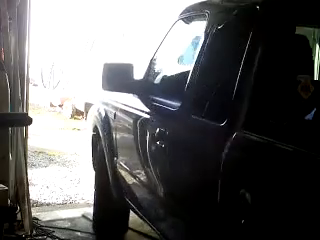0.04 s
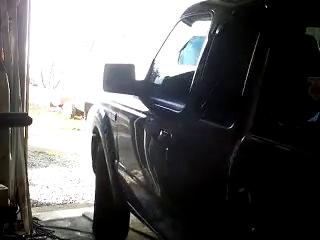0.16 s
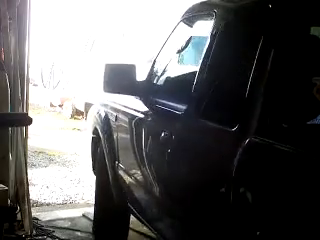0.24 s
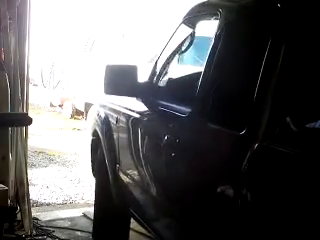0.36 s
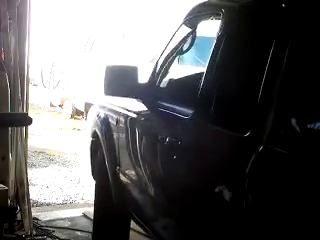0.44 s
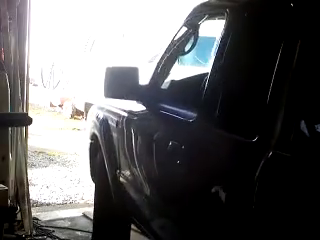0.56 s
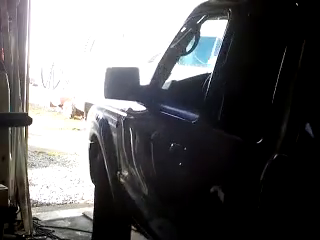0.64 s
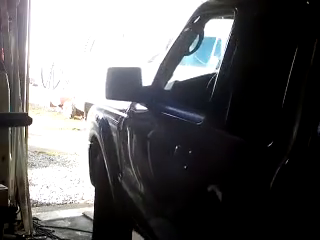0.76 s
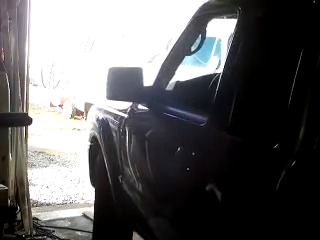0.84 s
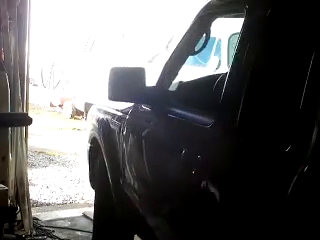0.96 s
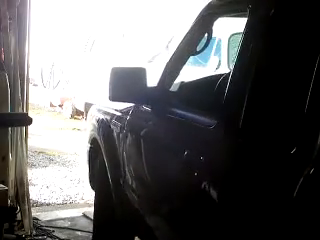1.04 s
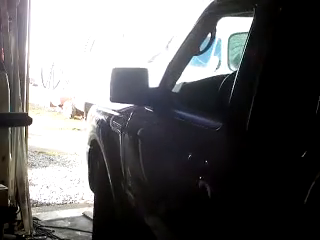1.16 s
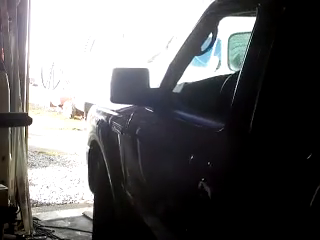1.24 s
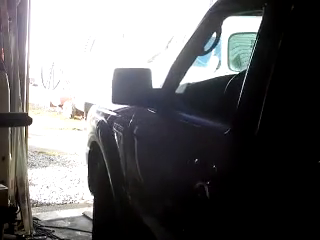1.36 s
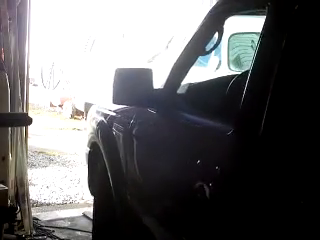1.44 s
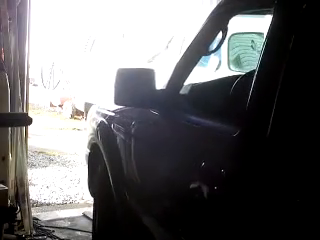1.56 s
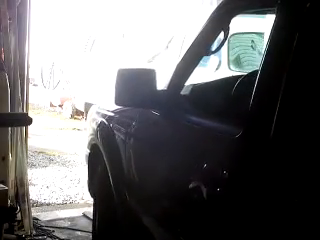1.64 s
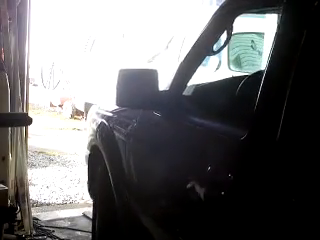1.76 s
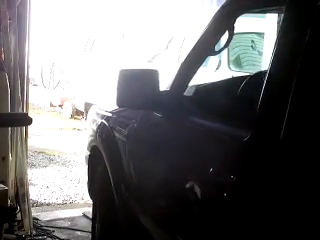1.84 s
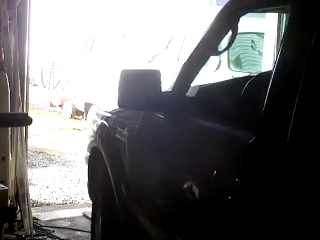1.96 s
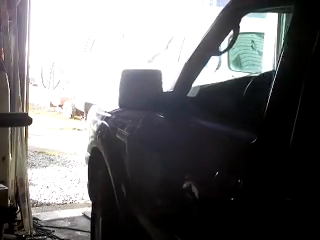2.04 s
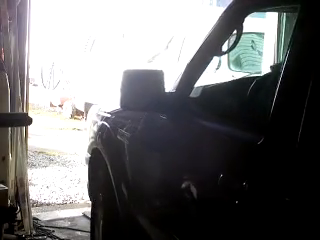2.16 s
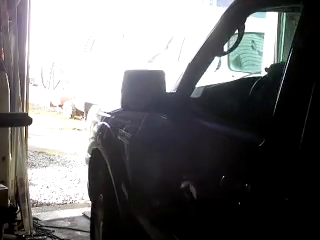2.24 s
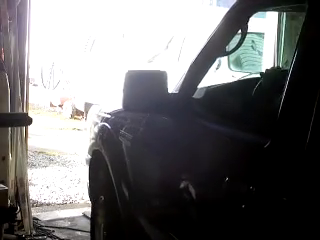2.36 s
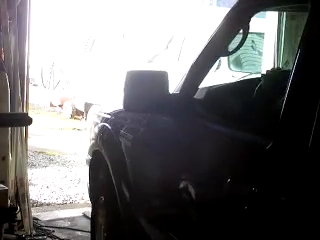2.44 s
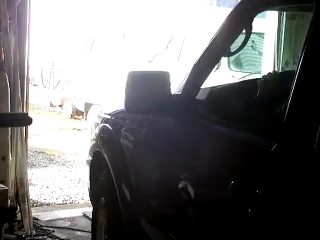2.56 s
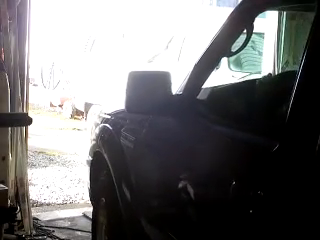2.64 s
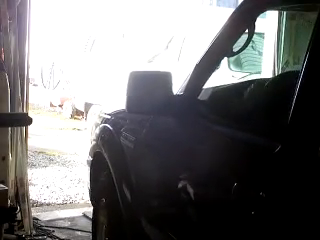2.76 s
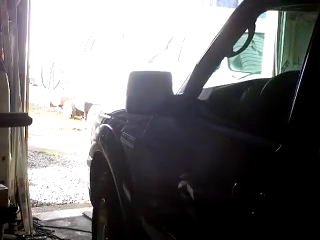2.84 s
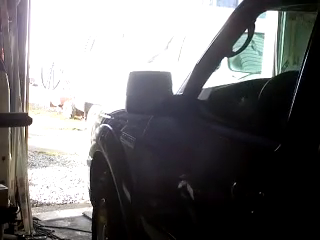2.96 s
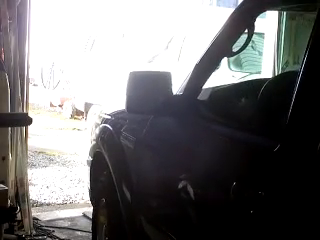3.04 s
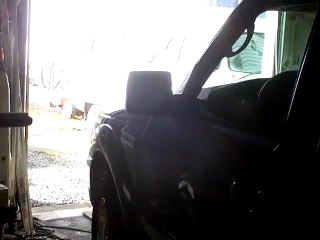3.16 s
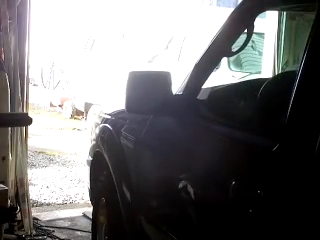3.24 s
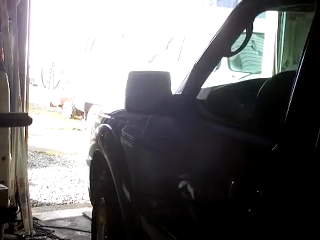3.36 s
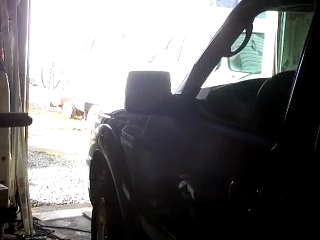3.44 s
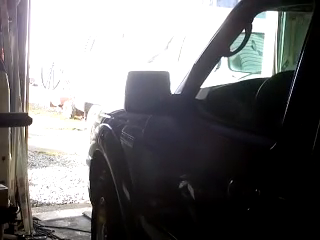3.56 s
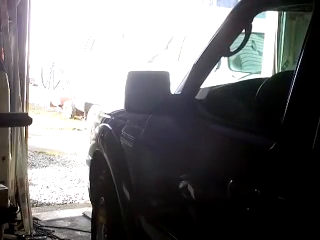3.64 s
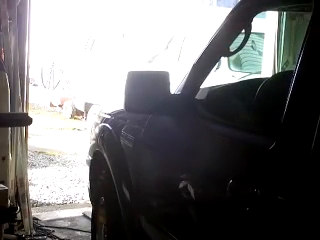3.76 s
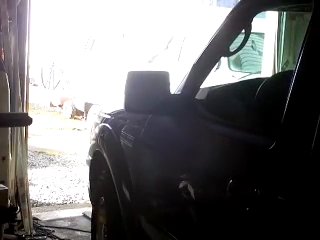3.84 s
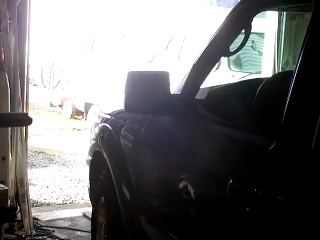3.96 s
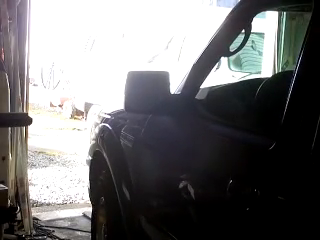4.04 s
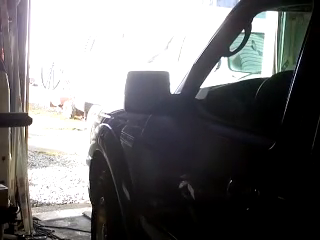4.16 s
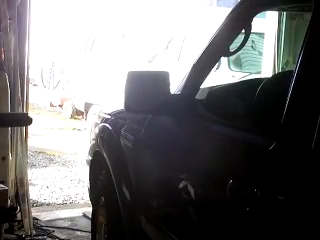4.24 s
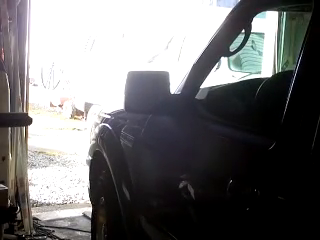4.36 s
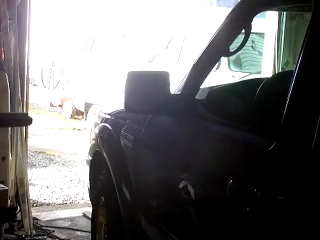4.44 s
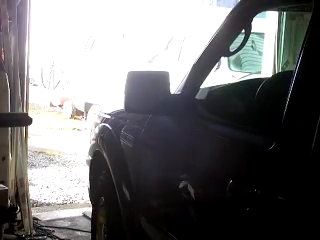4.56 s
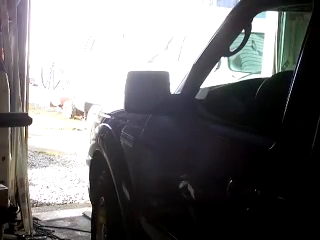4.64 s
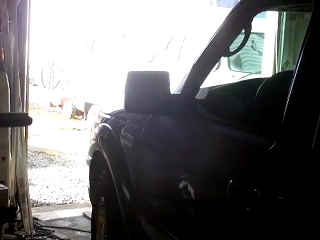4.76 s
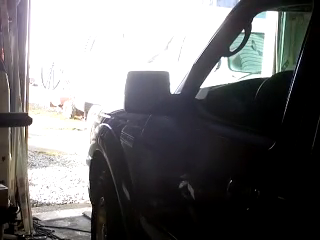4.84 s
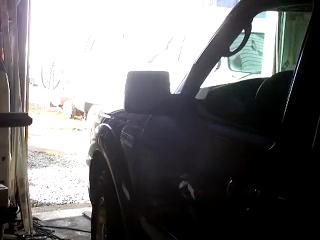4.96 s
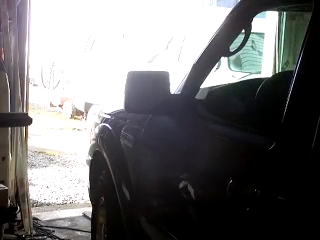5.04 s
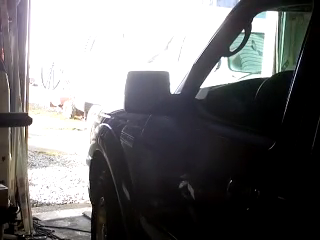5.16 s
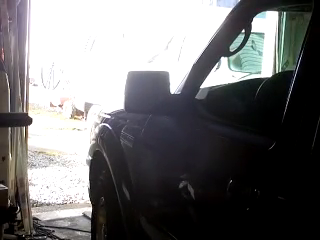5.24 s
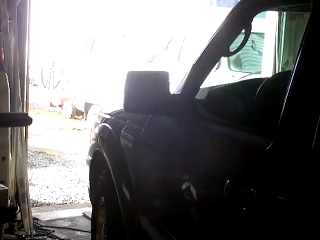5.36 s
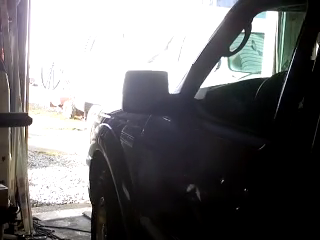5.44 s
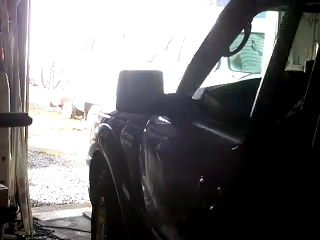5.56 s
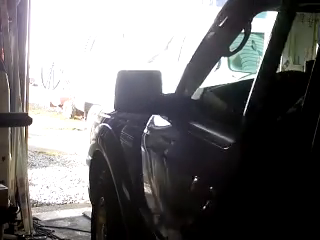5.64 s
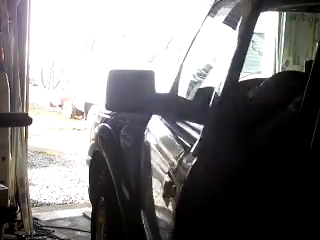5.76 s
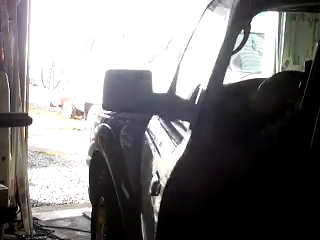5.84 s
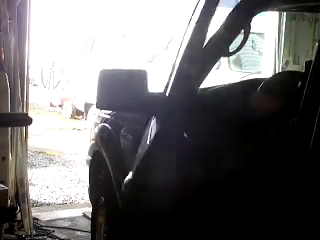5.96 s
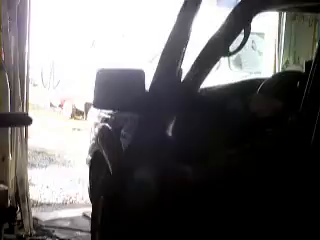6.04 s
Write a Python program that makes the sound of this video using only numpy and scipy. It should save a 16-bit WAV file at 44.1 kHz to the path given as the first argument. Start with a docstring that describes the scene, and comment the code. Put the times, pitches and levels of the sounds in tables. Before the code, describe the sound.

A pickup's six-cylinder engine idles from the start, heard close beside the cab in a garage doorway. The exhaust drones and booms unevenly, with valve clatter, fan and belt hiss and thin pulley whine. A panel buzz peaks around 0.2 s and fades; at 0.25 s a small hard object clacks down and bounces. Gritty shoe scuffs come at 0.6 and 0.8 s, with shorter ones around 2.4, 2.7 and 3.1 s. From about 1.2 s the idle eases slightly slower, still lumpy. At 4.04 s the engine is switched off, dropping quickly in pitch and shuddering to rest by about 5 s. Light hollow taps sound over quiet low yard noise. Soft handle knocks from 5.1 s lead to a hard, bright latch knock with a low thump at 5.41 s. Rattles follow, then the door is caught at 5.7 s with a hollow metallic clunk and small final knocks to 6 s.

```python
"""A six-cylinder pickup idles fast in a garage doorway, heard from beside the cab, then settles to a slower idle.
Firings drone and boom in the exhaust, valve gear clatters, fan and belt hiss, pulleys whine and a panel buzzes.
Early on, something small and hard clacks down; now and then shoes scuff the concrete with gritty noise.
At 4.04 s the engine is switched off: it slows and shudders to rest while light taps ring the cab.
Then handle and latch knock, ringing sheet metal, and the door springs open, thuds and is caught by its stay."""
import sys
import numpy as np
from scipy import signal
from scipy.fft import rfft, irfft, next_fast_len
from scipy.io import wavfile
from scipy.ndimage import uniform_filter1d

SR = 44100
rng = np.random.default_rng(int(sys.argv[2]) if len(sys.argv) > 2 else 0)


def pcm_store(signal):
    """Save signal as 16-bit PCM."""
    levels = np.round(np.clip(np.atleast_2d(signal), -1, 1) * 32767)
    wavfile.write(sys.argv[1], SR, levels.astype(np.int16).T)


N = 268569
T = np.arange(N) / SR  # time [s]


def undb(db):
    """Turn decibels into a gain."""
    return 10 ** (np.asarray(db) / 20)


def unit(x):
    """Scale to an average (rms) strength of 1."""
    return x / np.sqrt(np.mean(x ** 2) + 1e-20)


def curve(rows, axis=1):
    """One column of a table, joined by straight lines in time."""
    rows = np.array(rows)
    return np.interp(T, rows[:, 0], rows[:, axis])


def at(points, hz):
    """Read (Hz, value) points along a log-frequency axis."""
    f, value = np.transpose(points)
    return np.interp(np.log(hz + 1e-3), np.log(f), value)


def colour(x, points, tilt_db=0):
    """Filter with the given spectrum, tilted about 1 kHz by tilt_db per octave."""
    size = 2 * next_fast_len(len(x))
    hz = np.arange(size // 2 + 1) * SR / size
    octaves = np.log2(np.maximum(hz, 100) / 1000)
    # folding the cepstrum makes the filter respond only after its input
    cepstrum = irfft(np.log(undb(at(points, hz) + tilt_db * octaves)))
    cepstrum[1:size // 2] *= 2
    cepstrum[size // 2 + 1:] = 0
    response = np.exp(rfft(cepstrum))
    return irfft(rfft(x, size) * response)[:len(x)]


def swell(s, half):
    """A smooth bump of height 1 around time s."""
    return np.exp(-((T - s) / half) ** 2)


def decay(age, t60):
    """Die away by 60 dB in t60 seconds."""
    return np.exp(-np.log(1000) * age / t60)


def noise():
    """White noise: equal strength at all pitches."""
    return rng.standard_normal(N)


def walk(rate):
    """Smooth random wandering with a spread near 1, from about `rate` random steps per second."""
    k = int(SR / rate)
    steps = np.repeat(rng.standard_normal(N // k + 1), k)[:N]
    return unit(uniform_filter1d(uniform_filter1d(steps, k), k))


def tone(hz, waver):
    """A steady tone of rms 1 whose phase wavers."""
    return np.sqrt(2) * np.sin(2 * np.pi * hz * T + waver * (walk(20.97) + .5 * walk(90)))


def resonate(x, hz, width_hz):
    """One resonance, gain 1 at its centre."""
    return signal.lfilter(*signal.iirpeak(hz, hz / width_hz, fs=SR), x)


def band_noise(hz, width_hz):
    """Noise through the same resonance twice, rms 1."""
    return unit(resonate(resonate(noise(), hz, width_hz), hz, width_hz))


def strike(blows, modes, grit, grit_db, grit_t60):
    """Hard contacts: each rings the modes, slightly detuned, and leaves a short burst of grit."""
    out = 0
    for s, db in blows:
        age = np.maximum(T - s, 0)
        out = out + undb(db + grit_db) * grit * (T > s) * decay(age, grit_t60)
        detune = 1 + 0.008 * rng.standard_normal(len(modes))
        for (hz, mode_db, t60), shift in zip(modes, detune):
            out = out + undb(db + mode_db) * np.sin(2 * np.pi * hz * shift * age) * decay(age, t60)
    return out


KEY_OFF_S, COAST_HZ_PER_S = 4.04, 28  # ignition off; friction then slows the firings evenly
# idle speed, settling from a fast idle: (time [s], firing rate [firings per second])
IDLE_SPEED = [(0, 27.15), (.75, 27.65), (1.15, 27.5), (1.4, 26.8), (1.75, 26.75), (2, 25.8), (2.5, 25.55),
              (2.78, 26.4), (3, 25.65), (4.02, 25.75)]


def firing_rate():
    """Firings per second: the idle, then an even coast to rest."""
    return np.maximum(curve(IDLE_SPEED) - COAST_HZ_PER_S * np.maximum(T - KEY_OFF_S, 0), 0)


STALL_S = 0.37  # time for the driven parts to fade after the ignition goes off


def running_fade():
    """1 while the engine runs, then a straight fall to 0 after the ignition goes off."""
    return np.clip(1 - (T - KEY_OFF_S) / STALL_S, 0, 1)


SETTLE_FROM_S, SETTLE_S = 1.2, 2.1  # fast idle gives way to settled idle: start and duration


def settling():
    """0 at fast idle, 1 at settled idle."""
    return np.clip((T - SETTLE_FROM_S) / SETTLE_S, 0, 1)


# loudness of the exhaust before lope, stall and pipe ring: (time [s], level [dB])
EXHAUST_LEVEL = [(0, -33), (.4, -31.5), (.55, -31), (1.05, -34), (1.6, -33.5), (2, -33.5), (2.2, -31),
                 (3.1, -32.5), (4.2, -31.5)]
# strong beats and stumbles from uneven combustion: (time [s], gain [dB], half length [s])
UNEVEN_BEATS = [(.435, -4, .018), (.575, 4.5, .045), (.652, -8, .018), (.695, 2.5, .02), (.765, -4, .018),
                (.91, 1.5, .025), (1.02, 2, .025), (1.11, 2, .02), (1.172, -7, .022), (1.24, 2, .025),
                (1.35, 3, .025), (1.525, -4, .02), (1.845, -4, .018), (2.295, -8, .018), (2.335, 3, .02),
                (2.41, 3, .025), (2.61, -7, .018), (2.81, 2.5, .04), (2.89, -4, .018), (3.11, -6, .03),
                (3.25, 2.5, .03), (3.35, 2.5, .025), (3.4, -4, .015), (3.83, -4, .018), (4.19, 3.5, .03)]
# colour of the boom in the pipe: (frequency [Hz], relative level [dB per Hz])
PIPE_SPECTRUM = [(20, -11.5), (38, -16), (55, -4.5), (70, -11), (88, -4.5), (104, -9), (122, -5), (170, -8),
                 (195, -9), (220, -26.5), (400, -65)]
# drone: (multiple of the crank rate, fast-idle level [dB], settled-idle level [dB]), levels relative
DRONE_ORDERS = [(3, -14, -6), (6, -12, -10), (7, -22, -21), (8, -25, -8), (9, -2.5, -6), (10, -15, -19),
                (11, -8, -22), (12, -1, -5), (13, -21, -17), (15, -18, -18), (16, -21, -17), (18, -11, -19),
                (19, -19, -17), (20, -17, -18), (21, -9, -9), (23, -30, -20), (30, -14, -19),
                (33, -19, -24), (36, -30, -15), (39, -22, -25), (42, -32, -24), (49, -20, -34),
                (51, -32, -23), (52, -32, -22)]
# unequal cylinders make the exhaust lope:
# (firings per swell, peak as a share of the swell, fast-idle depth [dB], settled-idle depth [dB])
LOPE_SWELLS = [(6, .68, 1.0, .3), (3, .42, .7, .4)]
PIPE_RING_HZ, PIPE_RING_WIDTH_HZ, PIPE_RING_DB = 86.8, 2.2, 8  # a sharp resonance of the pipe
BEAT_WIDTH_HZ = 65
PUMPING_DB = -4.5  # change in level without fuel, when the engine only pumps air
PUMPING_SPEED_POWER = 1.2  # pumped air fades with speed to this power


def exhaust(firing, speed, running, drone_db=-1.0, boom_db=-13, waver_db=1.5, dispersion=.04):
    """The crank's orders drone and lope; chance in the firings makes the pipe boom between them."""
    settled = settling()
    drone = 0
    for k, fast_db, slow_db in DRONE_ORDERS:
        db = fast_db + settled * (slow_db - fast_db) + waver_db * walk(7)
        # every third order is locked to the firings; the rest drift with the balance of the cylinders
        drift = 1.5 * walk(1.5) if k % 3 else .2 * walk(9)
        # the long pipe delays the higher orders, smearing each firing
        phase = 2 * np.pi * k * firing / 3 - dispersion * k ** 2 + drift
        drone = drone - undb(db) * np.cos(phase)

    starts = np.flatnonzero(np.diff(np.floor(firing)))
    pulses = np.zeros(N)
    pulses[starts] = np.tanh(rng.standard_normal(len(starts)))  # each firing has a random strength
    boom = unit(colour(unit(pulses) + noise(), PIPE_SPECTRUM))

    lope_db = 0
    for every, peak, fast_db, slow_db in LOPE_SWELLS:
        depth_db = fast_db + settled * (slow_db - fast_db)
        lope_db = lope_db + depth_db * np.cos(2 * np.pi * (firing / round(every) - peak))
    stall = undb(PUMPING_DB * (1 - running)) * speed ** PUMPING_SPEED_POWER
    gas = undb(drone_db) * unit(drone) + undb(boom_db) * boom
    gas = gas * undb(curve(EXHAUST_LEVEL) + lope_db) * stall
    gas = gas + undb(PIPE_RING_DB) * resonate(gas, PIPE_RING_HZ, PIPE_RING_WIDTH_HZ)
    # strong and weak beats show in the pipe's lowest resonance
    beats_db = sum(db * swell(s, half) for s, db, half in UNEVEN_BEATS)
    return gas + (undb(beats_db) - 1) * resonate(gas, PIPE_RING_HZ, BEAT_WIDTH_HZ)


# colour of the clatter through the engine block: (frequency [Hz], relative level [dB per Hz])
BLOCK_SPECTRUM = [(120, -42), (215, 5.5), (255, -0.5), (340, 2), (480, -3), (660, -5.5), (830, -3),
                  (1030, 2.5), (1220, -3), (1400, -11), (2000, -14), (2900, -13.5), (4400, -26),
                  (10000, -56)]
# ringing of block and covers: (frequency [Hz], width [Hz], relative level [dB])
COVER_MODES = [(266, 12, -7), (370, 31, 2), (447, 21, 0), (520, 7, -1), (608, 14, -1.5), (722.4, 8.5, 4),
               (813, 15, 0), (905, 14, -1.5), (1008, 25, -7.5), (1179, 14, 0)]
# colour of the fan and belt hiss: (frequency [Hz], relative level [dB per Hz])
FAN_SPECTRUM = [(880, -25), (1500, 3.5), (1780, 1), (3020, 1.5), (4310, -6.5), (6060, -9.5), (7310, -13),
                (7990, -19), (9250, -16.5), (10400, -33.5), (13600, -63), (22000, -120)]
# fan and belt hiss at idle: (time [s], level [dB])
HISS_LEVEL = [(0, -54), (.6, -51.5), (1.3, -53), (1.9, -51.5), (2.4, -51.5), (3, -54.5), (4, -55)]
CLATTER_DB, CLATTER_SPEED_POWER = -44, 1.7  # level at idle; amplitude goes with speed to this power
FAN_SPEED_POWER = 2


def engine_bay(firing, speed, tap_decay=1.0, flicker_db=1):
    """Valve gear and pistons repeat their clatter each crank turn and ring the covers; the fan hisses more evenly."""
    loose, beat, covers_db, cover_waver_db = .6, 1.0, -5, 3
    one_turn = rng.standard_normal(4900)
    place = firing / 3 % 1 * len(one_turn)  # three firings to a crank turn
    repeating = unit(np.interp(place, np.arange(len(one_turn)), one_turn))
    taps = unit(1 + beat * np.exp(-(firing % 1) / tap_decay))  # a push at each firing
    force = (repeating * speed + loose * noise()) * taps * undb(flicker_db * walk(60))
    ringing = 0
    for hz, width, db in COVER_MODES:
        ringing = ringing + undb(db + cover_waver_db * walk(3.09)) * resonate(force, hz, width)
    clatter = unit(unit(colour(force, BLOCK_SPECTRUM)) + undb(covers_db) * unit(ringing))
    clatter = clatter * undb(CLATTER_DB) * speed ** CLATTER_SPEED_POWER
    hiss = unit(colour(noise() * np.sqrt(taps), FAN_SPECTRUM))
    return clatter + hiss * undb(curve(HISS_LEVEL)) * speed ** FAN_SPEED_POWER


# whining belt-driven pulleys and pumps, levels before the shared whine_db:
# (multiple of the crank rate, fast-idle level [dB], settled-idle level [dB])
PULLEY_ORDERS = [(62.2, -62, -57), (69.2, -58.5, -56), (76.5, -59, -62), (95, -60, -58), (102, -60, -56),
                 (108.5, -60, -61), (113, -58, -59), (118, -59, -54.5), (138, -63, -55.5),
                 (163.5, -68, -64)]


def pulleys(firing, running, whine_db=-1.0):
    """Whines that follow the crank, swell and fade as the belt slips, and die as the load comes off."""
    waver_db, slip = 3.5, .8  # slip: wander of the phase [rad]
    settled = settling()
    out = 0
    for k, fast_db, slow_db in PULLEY_ORDERS:
        turning = np.sin(2 * np.pi * k * firing / 3 + slip * walk(25))
        strand = unit(turning * undb(waver_db * walk(7)))
        out = out + strand * undb(whine_db + fast_db + settled * (slow_db - fast_db))
    return out * running


# a panel buzzes up at fast idle, then dies back to a faint hum
PANEL_PEAK_S, PANEL_PEAK_DB, PANEL_REST_DB = 0.22, -43.5, -57
PANEL_RISE_DB_PER_S, PANEL_FADE_DB_PER_S = 35, 12
PANEL_FLUTTER_DB = 2.2


def whines(running):
    """A buzzing panel and a thin whine while the engine runs; a faint electrical whine throughout."""
    age = T - PANEL_PEAK_S
    swell_db = PANEL_PEAK_DB + np.minimum(PANEL_RISE_DB_PER_S * age, -PANEL_FADE_DB_PER_S * age)
    buzz_db = np.maximum(swell_db, PANEL_REST_DB) + PANEL_FLUTTER_DB * walk(28)
    buzz = tone(447, 0.86) * undb(buzz_db)
    thin = tone(5912, 2.2) * undb(-76)
    electrical = tone(3951, 1.4) * undb(-82.5)
    return running * (buzz + thin) + electrical


def rocking(firing, running, rock_db=-40):
    """The engine rocks once per crank turn, felt as a very low throb that fades after switch-off."""
    return undb(rock_db) * np.sin(2 * np.pi * firing / 3) * running


# colour of the quiet yard: (frequency [Hz], relative level [dB per Hz])
YARD_SPECTRUM = [(20, -5.5), (90, 2), (170, -3), (350, -7), (550, -11), (950, -12.5), (1400, -22),
                 (2500, -26), (4500, -30.5), (7000, -37), (9000, -41.5), (10500, -71.5)]


def quiet_yard(yard_db=-59):
    """A soft bed of mostly low noise whose level wanders a little."""
    return unit(colour(noise(), YARD_SPECTRUM)) * undb(yard_db + 1.2 * walk(5.6))


# blows of something small and hard clacking down: (time [s], level [dB])
CLACK_BLOWS = [(.2528, -27), (.2585, -35), (.2695, -29), (.279, -39), (.302, -44)]
# its ringing: (frequency [Hz], level against the blow [dB], t60 [s]); t60 is the time to fade by 60 dB
CLACK_RINGING = [(880, -10, 0.045), (990, -2, 0.08), (1040, -9, .16), (1210, -13, 0.06), (1610, -16, 0.15),
                 (1760, -19, .18), (1916, -19, .08), (2309, -21, .1)]


def clacks():
    """A small hard object lands, bounces and rattles to rest."""
    grit = band_noise(1220, 850) * undb(1.8 * walk(300))
    return strike(CLACK_BLOWS, CLACK_RINGING, grit, grit_db=-13.5, grit_t60=.15)


# scuffs and rustles: (time [s], level [dB], half length [s], brightness [dB per octave])
SCUFF_EVENTS = [(0.618, -39.5, 0.066, -7), (0.815, -45, 0.067, -6), (1.024, -55, 0.035, -1),
                (2.375, -48, 0.037, -3.5), (2.714, -40, 0.014, -8.5), (3.138, -40.5, 0.025, -8.5),
                (5.35, -60, 0.022, -6), (5.95, -64.5, 0.041, 2)]
# colour of shoe on concrete before the brightness tilt: (frequency [Hz], relative level [dB per Hz])
SHOE_SPECTRUM = [(300, -18.5), (900, 1.5), (1700, -3.5), (3400, 0), (5000, -3.5), (7500, -7.5),
                 (10500, -16)]


def scuffs(grain_db=3):
    """Short gritty swells of friction."""
    grit = noise() * undb(grain_db * walk(500))
    out = 0
    for s, db, half, tilt_db in SCUFF_EVENTS:
        out = out + undb(db) * swell(s, half) * unit(colour(grit, SHOE_SPECTRUM, tilt_db))
    return out


# body swaying and pipe ringing as the engine stalls:
# (time of the peak [s], frequency [Hz], level before flutter [dB], half length [s])
STALL_SWAYS = [(4.1, 171, -35, 0.13), (4.15, 9, -27, 0.091), (4.33, 89, -35, 0.18), (4.37, 178, -41, 0.093),
               (4.461, 24.6, -29.5, 0.155), (4.724, 8.73, -31.5, 0.18)]
# rumble as the engine jolts and rocks to rest on its mounts: (time [s], level [dB], half length [s])
STALL_JOLTS = [(4.059, -34, 0.037), (4.452, -44, .07), (4.66, -48, 0.07), (4.85, -57, 0.15)]
# colour of the rumble: (frequency [Hz], relative level [dB per Hz])
MOUNT_SPECTRUM = [(25, -18), (55, -4), (100, 8), (140, -7.5), (250, -35), (500, -71)]


def shudder():
    """The slowing engine sweeps through the resonances of its mounts and pipe, fluttering unevenly."""
    flutter_db = 2
    sway = 0
    for s, hz, db, half in STALL_SWAYS:
        bump = 1 / np.cosh(np.clip(1.55 * (T - s) / half, -50, 50))
        sway = sway + undb(db + flutter_db * walk(30)) * np.cos(2 * np.pi * hz * (T - s)) * bump
    jolts = sum(undb(db) * swell(s, half) for s, db, half in STALL_JOLTS)
    return sway + jolts * unit(colour(noise(), MOUNT_SPECTRUM))


# hollow taps from inside the cab: (time [s], level [dB])
TAP_BLOWS = [(4.577, -51.5), (4.974, -56.5), (5.123, -58.5), (5.672, -47.5)]
# ringing of the cab panels: (frequency [Hz], level against the tap [dB], t60 [s])
TAP_RINGING = [(346, -8.5, .15), (578, -1, 0.18), (803, -2.5, 0.29), (865, -1.5, 0.2), (1140, -11, .1)]


def cab_taps():
    """Light contacts ring the panels of the cab."""
    return strike(TAP_BLOWS, TAP_RINGING, band_noise(800, 700), grit_db=-8.0, grit_t60=0.11)


CHATTER_DB = 1.8  # loose parts chatter in the tail of each knock
# colour of the door's rattle before the brightness tilt: (frequency [Hz], relative level [dB per Hz])
DOOR_SPECTRUM = [(35, -32), (60, 3.5), (458, -8.5), (619, -13), (689, -15.5), (1060, -16), (1150, -22.5),
                 (1280, -22.5), (1730, -26.5), (2280, -28.5), (3020, -36.5), (3430, -35.5), (4430, -47),
                 (7410, -60), (10000, -74), (13000, -100), (22000, -120)]
# door and body panels: (frequency [Hz], relative level before tilt [dB], t60 before stretch [s])
PANEL_MODES = [(118.5, 3.5, 0.29), (175.7, 2, 0.3), (241, -0.5, 0.29), (327.6, 0.5, 0.33),
               (366, -6.5, 0.56), (450, -1.5, 0.2), (526, -2, 0.18), (652, -9, 0.21), (700, -8.5, 0.3),
               (784, -11, 0.2), (860, -10, 0.38), (954, -0.5, 0.11), (992, -3, 0.12), (1144, -7.5, 0.22),
               (1185, -6, 0.09), (1400, -12.5, 0.16)]
# garage decay: (frequency [Hz], t60 before stretch [s])
GARAGE_DECAY = [(60, 1), (250, 0.5), (800, 0.75), (1600, 0.29), (3500, 0.31), (9000, 0.24)]


def knock(tilt_db, rise, stretch, crack=0.21, crack_s=0.024, late_db=-26, late_t60=6.8):
    """A blow rings the sheet metal; rattle and garage walls add a dense tail."""
    t = T[:SR]
    ring_db = 2.5  # panel modes over the rattle
    rattle = 0
    edges = np.geomspace(40, 12000, 9)  # edges of the noise bands [Hz]
    for lo, hi in zip(edges, edges[1:]):
        band_filter = signal.butter(2, [lo, hi], "band", fs=SR, output="sos")
        band = signal.sosfilt(band_filter, rng.standard_normal(SR))
        fade = undb(-60 * t / (stretch * at(GARAGE_DECAY, np.sqrt(lo * hi))))
        early = fade * (1 + crack * np.exp(-t / crack_s))
        rattle = rattle + band * (early + undb(late_db) * decay(t, late_t60))
    rattle = rattle * undb(CHATTER_DB * walk(250)[:SR])

    detune = 1 + .007 * rng.standard_normal(len(PANEL_MODES))  # each blow loads the panel differently
    ring = 0
    for (hz, db, t60), shift in zip(PANEL_MODES, detune):
        gain = undb(db + tilt_db * np.log2(hz / 1e3))
        wave = np.sin(2 * np.pi * (hz * shift * t + rng.random()))
        ring = ring + gain * decay(t, t60 * stretch) * wave
    sound = unit(colour(rattle, DOOR_SPECTRUM, tilt_db)) + undb(ring_db) * unit(ring)
    sound = sound * (1 - np.exp(-t / rise))
    return sound / np.std(sound[:SR // 30])  # level set by the first thirtieth of a second


# knocks of handle, latch and door, levels before the shared knocks_db:
# (time [s], level [dB], brightness [dB per octave], rise [s], ring stretch [factor])
DOOR_KNOCKS = [(4.752, -58, 0.5, 0.0025, 0.53), (5.122, -46.5, -2, 0.0022, 1.1),
               (5.154, -43.5, -4, 0.027, 0.5), (5.318, -47, 0.5, 0.0034, 1.9), (5.41, -38, 0, 0.0012, 0.3),
               (5.413, -27.5, 2, 0.002, 0.92), (5.513, -46, 1, 0.0014, 0.84),
               (5.584, -49.5, -0.5, .002, 1.1), (5.671, -50.5, 1, .002, 1.3), (5.703, -37, 4, 0.0032, 0.7),
               (5.727, -41, 0.5, 0.00069, 0.63), (5.757, -48.5, 4, .003, 1), (5.782, -50, 4, .001, 1.1),
               (5.885, -50.5, 1.5, 0.0034, 1.5), (5.929, -46, 4, 0.012, 0.22), (5.96, -48.5, 1, 0.003, 1)]


def door(thump_hz=43, thump_db=-23, thump_t60=0.41, knocks_db=-2):
    """All knocks; with the hardest, the door springs off its seal with a low thump."""
    latch_s = max(DOOR_KNOCKS, key=lambda row: row[1])[0]
    age = np.maximum(T - latch_s, 0)
    out = undb(thump_db) * np.sin(2 * np.pi * thump_hz * age) * decay(age, thump_t60)
    for s, db, tilt_db, rise, stretch in DOOR_KNOCKS:
        start = int(s * SR)
        out[start:start + SR] += undb(db + knocks_db) * knock(tilt_db, rise, stretch)[:N - start]
    return out


# the door thuds against its seal and hinge stops: (time [s], level [dB])
THUD_BLOWS = [(5.414, -30), (5.503, -39), (5.526, -35)]
# hollow ringing of the thuds: (frequency [Hz], level against the blow [dB], t60 [s])
THUD_RINGING = [(48, 2.5, 0.054), (75, 4, 0.08), (113, -3, 0.065)]
# the swinging door is caught by its stay: (time [s], level [dB])
CATCH_BLOWS = [(5.707, -40.5), (5.728, -42.5)]
# ringing of the door's shell: (frequency [Hz], level against the blow [dB], t60 [s])
SHELL_RINGING = [(205, 1, 0.3), (319, -4, .2), (455, -3, .16), (607, -6, .2), (693, -11, 0.12)]


def door_shell():
    """The hollow door thuds as it comes free and booms as its stay catches it."""
    rumble = unit(colour(noise(), MOUNT_SPECTRUM))
    thuds = strike(THUD_BLOWS, THUD_RINGING, rumble, grit_db=-20, grit_t60=.08)
    rattle = band_noise(450, 450)
    catches = strike(CATCH_BLOWS, SHELL_RINGING, rattle, grit_db=-12, grit_t60=0.16)
    return thuds + catches


# the steel latch snaps open and springs back, then the door stay clicks: (time [s], level [dB])
LATCH_SNAPS = [(5.4165, -44.5), (5.4245, -46.5), (5.514, -52), (5.61, -63), (5.7055, -48.5)]
# ringing of the steel: (frequency [Hz], level against the snap [dB], t60 [s])
LATCH_RINGING = [(1546, -8, .16), (1620, -11, 0.14), (1846, -9, 0.14), (2180, -13, 0.11), (2320, -10, .09),
                 (2640, -10, 0.09), (3160, -17, .12), (3350, -11, .11), (3390, -10, 0.1)]
# colour of the latch's rattle: (frequency [Hz], relative level [dB per Hz])
LATCH_SPECTRUM = [(600, -13), (1400, 4), (2400, -1), (3400, -7), (4500, -16), (9000, -29), (11000, -53)]


def latch():
    """Steel parts snap with a short ring and a dense rattle."""
    grit = unit(colour(noise(), LATCH_SPECTRUM)) * undb(CHATTER_DB * walk(300))
    return strike(LATCH_SNAPS, LATCH_RINGING, grit, grit_db=-7, grit_t60=0.18)


def scene():
    """Engine, door and shoes over the quiet yard."""
    rate = firing_rate()
    firing = np.cumsum(rate) / SR  # firings so far
    speed = rate / curve(IDLE_SPEED)  # 1 at idle, 0 at rest
    running = running_fade()
    engine = exhaust(firing, speed, running) + engine_bay(firing, speed)
    engine = engine + pulleys(firing, running) + whines(running) + rocking(firing, running)
    yard = quiet_yard()
    small_sounds = clacks() + scuffs()
    stopping = shudder() + cab_taps()
    opening = door() + door_shell() + latch()
    return (engine + yard + small_sounds + stopping + opening)[None]


TOP_HZ = 10200


def record(dry):
    """The microphone cuts the top: a steep filter removes what lies above TOP_HZ."""
    return signal.sosfilt(signal.ellip(10, .2, 70, TOP_HZ, fs=SR, output="sos"), np.atleast_2d(dry))


dry = scene()
out = record(dry)
pcm_store(out)
```